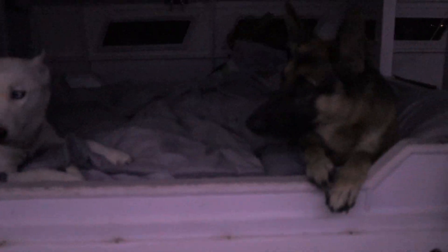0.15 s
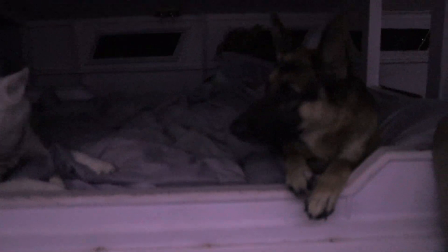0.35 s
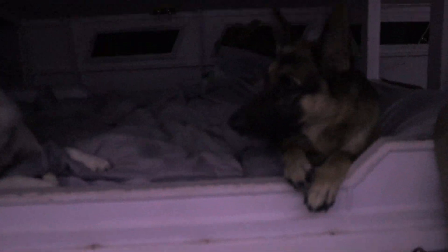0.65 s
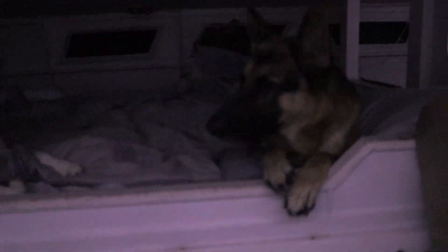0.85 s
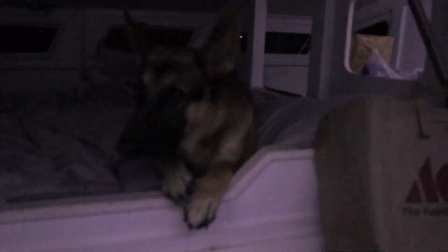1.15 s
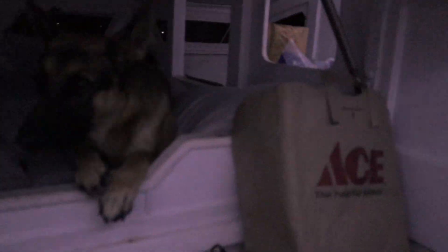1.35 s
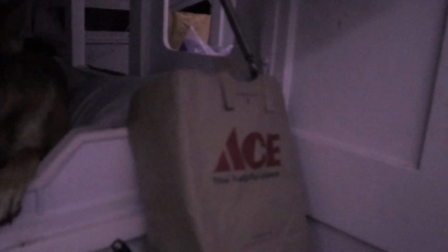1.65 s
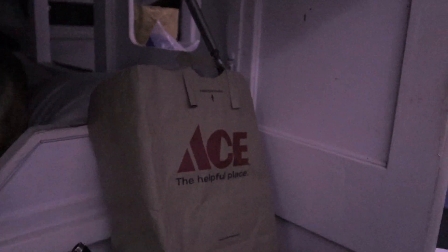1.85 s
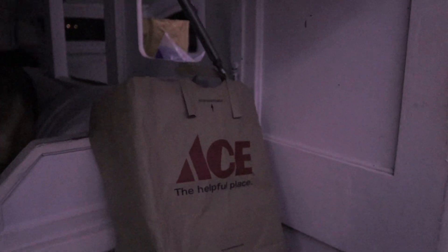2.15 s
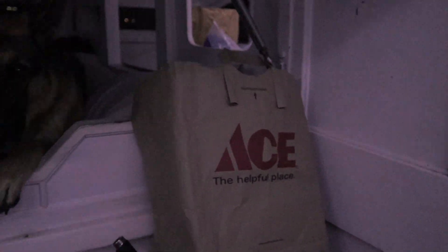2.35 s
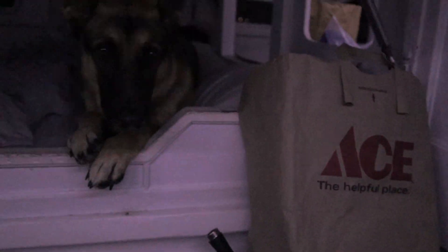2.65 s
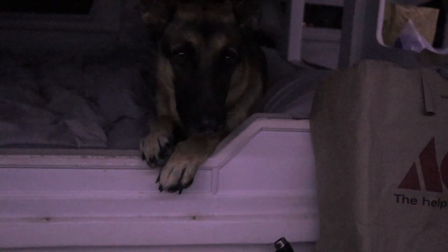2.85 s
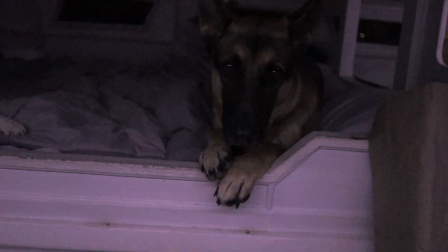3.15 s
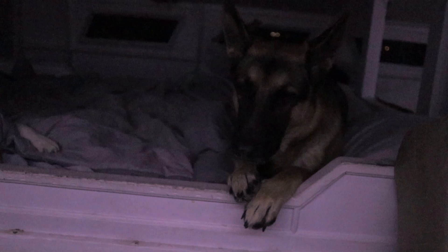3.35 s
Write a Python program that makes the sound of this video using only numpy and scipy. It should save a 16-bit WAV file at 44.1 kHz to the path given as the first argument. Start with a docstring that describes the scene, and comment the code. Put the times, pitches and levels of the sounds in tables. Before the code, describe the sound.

Strong storm wind rushes and howls in gusts around a boat cabin, with slaps and clacks

```python
"""Three gusts of storm wind rush past a moored boat, heard in the cabin: octave bands of noise. They buffet the
hull (low noise) and waves thump its panels (decaying sines); a hollow howl wavers in the rigging (tones in
narrow noise). Something loose, probably canvas, slaps on the cabin (noise bursts with panel resonances);
fittings clack and woodwork knocks (struck modes with noise). Light ticks sound in the boat and fine spray
hisses outside (filtered noise with grains)."""
import sys
import numpy as np
from scipy import signal
from scipy.fft import rfft, irfft
from scipy.io import wavfile
from scipy.ndimage import uniform_filter1d, minimum_filter1d

SR = 44100
rng = np.random.default_rng(int(sys.argv[2]) if len(sys.argv) > 2 else 0)


def bounce(signal):
    """Save signal as a 16-bit WAV file at the path given by the first command-line argument."""
    frames = np.transpose(np.atleast_2d(signal))
    limited = np.clip(frames, -1, 1)
    pcm = np.round(limited * 32767).astype(np.int16)
    wavfile.write(sys.argv[1], SR, pcm)


N = 154350
T = np.arange(N) / SR
FREQS = np.fft.rfftfreq(N, 1 / SR) + 1  # offset keeps the logarithms finite
CONTACT_S = 0.0014


def undb(db):
    """Decibels to gain."""
    return 10 ** (np.asarray(db) / 20)


def unit(x):
    """Scale to rms 1."""
    return x / np.sqrt(np.mean(x ** 2))


def curve(table, axis=1):
    """One column of a time table, joined by straight lines."""
    rows = np.array(table)
    return np.interp(T, rows[:, 0], rows[:, axis])


def over_hz(points):
    """A table read on a log-frequency axis."""
    rows = np.array(points)
    return np.interp(np.log(FREQS), np.log(rows[:, 0]), rows[:, 1])


def shape(x, gain):
    """Filter by a gain per frequency."""
    return irfft(rfft(x) * gain, N)


def noise():
    """Two unrelated noises: the middle and the sides of the sound field."""
    return rng.standard_normal((2, N))


def walk(rate_hz):
    """Smooth random wander, Gaussian spectrum, rms 1."""
    return unit(shape(rng.standard_normal(N), np.exp(-(FREQS / rate_hz) ** 2 / 2)))


def flutter(rate_hz):
    """Quick eddies with slow drift weakened, rms 1."""
    return unit(shape(rng.standard_normal(N), FREQS * np.exp(-(FREQS / rate_hz) ** 2 / 2)))


def grains(count):
    """Scattered clicks of unequal size, rms 1."""
    draw = rng.random((count, 4))
    size = (.02 + draw[:, 1]) ** -.4
    out = np.zeros((2, N))
    out[:, (draw[:, 0] * N).astype(int)] = size * np.sign(draw[:, 2:].T - .5)
    return unit(out)


def burst(start, rise, decay):
    """Straight rise, exponential fall (seconds)."""
    age = T - start
    return np.clip(age / rise, 0, 1) * np.exp(-np.maximum(age - rise, 0) / decay)


def struck(start, modes):
    """Modes set ringing by one soft-edged blow."""
    age = T[:SR // 4]
    ring = sum(undb(db) * np.sin(2 * np.pi * hz * age) * np.exp(-np.log(1000) * age / t60)
               for hz, db, t60 in modes)
    soft_edge = 1 - np.exp(-(age / CONTACT_S) ** 2)
    return np.pad(ring * soft_edge, (int(start * SR), N))[:N]


def cabin(x, t60, wet_db):
    """Short dense echoes of a small cabin: a decaying noise tail per channel."""
    age = T[:SR // 3]
    tail = rng.standard_normal((2, len(age))) * undb(-60 * age / t60)
    tail /= np.sqrt(np.sum(tail ** 2, axis=1, keepdims=True))
    echoes = signal.fftconvolve(x, tail, axes=1)[:, :N]
    return (x + undb(wet_db) * echoes) / np.hypot(1, undb(wet_db))


# Wind strength. Each row: time in seconds, relative level in dB (stretched in the treble).
GUST_STRENGTH = [(0, -1), (.2, 4), (.36, 5.5), (.52, 4), (.78, -2.5), (.9, 0.5), (1.02, -2.5), (1.15, 1.5),
                 (1.3, 4), (1.5, 2.5), (1.66, 0.5), (2.0, 0.5), (2.2, 4.5), (2.45, 5), (2.65, 1),
                 (2.86, 0.5), (3.1, 0), (3.36, -1), (3.5, 1)]
# Spectrum of the rushing air. Each row: frequency in Hz, relative density in dB per Hz.
RUSH_SPECTRUM = [(120, -13), (220, 0.5), (320, -0.5), (480, -4.5), (750, -8), (1050, -12.5), (1650, -14.5),
                 (2200, -19), (3200, -23.5), (4300, -30), (6300, -37), (8500, -48), (11300, -53.5),
                 (14500, -75.5)]
RUSH_DB, FLUTTER_DB, FLICKER_DB = -25.5, 1.1, 1.25


def rush(treble_push=1.53):
    """Turbulent air: octave bands follow the gusts, flutter together and flicker alone."""
    air = rfft(noise()) * undb(over_hz(RUSH_SPECTRUM))
    air /= np.std(irfft(air, N))
    gust_db = curve(GUST_STRENGTH)
    shared_db = FLUTTER_DB * flutter(7.3)
    octave = np.clip(np.log2(FREQS / 125), 0, 7)
    out = 0
    for k in range(8):
        band = np.maximum(1 - abs(octave - k), 0)
        push = np.interp(k, [2, 5], [1, treble_push])  # gusts swing the treble more
        level_db = push * gust_db + shared_db + FLICKER_DB * flutter(24.5)
        out = out + irfft(air * band, N) * undb(level_db)
    return out * undb(RUSH_DB)


# Boom of the buffeted hull. Each row: time in seconds, level in dB.
BOOM_LEVEL = [(0, -40), (.09, -27), (.15, -28), (.24, -30), (.32, -21.5), (.46, -26), (.75, -32),
              (1.05, -36), (1.25, -23), (1.56, -26.5), (1.68, -32), (2.05, -25.5), (2.31, -26), (2.38, -21),
              (2.48, -21), (2.54, -28), (2.9, -28), (3.5, -31)]
# Boom spectrum. Each row: frequency in Hz, relative density in dB per Hz.
BOOM_SPECTRUM = [(50, -27), (75, -4), (102, 2.5), (121, -7.5), (140, -1), (170, -3), (205, -5), (260, -9.5),
                 (500, -37), (1200, -77)]
# Deep pressure swell in the cabin. Each row: time in seconds, level in dB.
SWELL_LEVEL = [(0, -41), (.25, -31), (.37, -27), (.5, -35), (.95, -41), (1.25, -30.5), (1.4, -26),
               (1.65, -30), (2.0, -31.5), (2.37, -29.5), (2.6, -39), (2.9, -34), (3.5, -30.5)]
# Swell spectrum. Each row: frequency in Hz, relative density in dB per Hz.
SWELL_SPECTRUM = [(12, -20), (25, -5), (38, -15), (54, -2.5), (70, -8.5), (100, -13), (200, -23),
                  (600, -68)]


def buffet():
    """Gusts make the hull boom and pump the air in the cabin: two bands of low noise."""
    boom = unit(shape(noise(), undb(over_hz(BOOM_SPECTRUM)))) * undb(curve(BOOM_LEVEL))
    swell = unit(shape(noise(), undb(over_hz(SWELL_SPECTRUM)))) * undb(curve(SWELL_LEVEL))
    return boom + swell


# Waves slap the hull panels. Each row: start in seconds, base pitch in Hz, relative level in dB, # rise in
# seconds, decay in seconds.
PANEL_THUMPS = [(0.113, 99.3, -20.5, 0.032, .05), (.285, 109.5, -10.5, 0.0083, 0.037),
                (0.329, 136, -10.5, 0.013, 0.02), (.34, 55, -16, 0.027, 0.032),
                (0.394, 267, -16.5, 0.0065, 0.035), (1.29, 200, -16, 0.021, 0.035),
                (1.345, 59.4, -24, 0.017, 0.06), (1.35, 130.4, -17, 0.018, 0.14),
                (1.49, 137.7, -18.5, 0.017, 0.047), (1.584, 208, -15, 0.011, .03),
                (2.216, 119, -13.5, 0.01, 0.03), (2.34, 94.7, -10, .01, 0.034),
                (2.395, 142.2, -10, 0.024, 0.051), (2.445, 102.3, -12.5, 0.023, 0.018)]
# Modes of a hull panel. Each row: multiple of the base pitch, relative level in dB.
HULL_MODES = [(1, -1.5), (1.579, -16), (2.3, -26)]


def thumps():
    """Hull panels swell into a boom as waves slap them, each at its own pitch."""
    out = 0
    for start, hz, db, rise, decay in PANEL_THUMPS:
        envelope = burst(start, rise, decay)
        for ratio, mode_db in HULL_MODES:
            out = out + undb(db + mode_db) * envelope * np.sin(2 * np.pi * hz * ratio * (T - start))
    return np.array([out, out])


# Main howl. Each row: time in seconds, centre pitch in Hz, level in dB.
MAIN_HOWL = [(0, 345, -49), (.55, 338, -32), (.72, 325, -28), (.82, 322, -26.5), (.9, 330, -27),
             (.99, 345, -25), (1.09, 340, -23.5), (1.2, 325, -27.5), (1.65, 338, -29.5), (1.85, 330, -27.5),
             (2.03, 320, -21), (2.2, 325, -29.5), (2.33, 330, -24.5), (2.65, 330, -26), (2.95, 335, -25.5),
             (3.09, 335, -22), (3.33, 335, -27.5), (3.5, 330, -25)]
# Higher howl. Each row: time in seconds, centre pitch in Hz, level in dB.
HIGHER_HOWL = [(0, 450, -24.5), (.05, 472, -27.5), (.12, 440, -62), (.8, 390, -40), (.97, 413, -28),
               (1.08, 423.6, -31.5), (1.16, 440, -29.5), (1.3, 415, -35), (1.9, 405, -49), (2.5, 415, -41),
               (2.66, 415, -27), (2.78, 414, -28), (2.9, 416, -23.5), (3.05, 420, -25), (3.19, 424, -23.5),
               (3.29, 410, -30.5), (3.5, 405, -33)]
# Fainter howl that comes and goes. Each row: time in seconds, centre pitch in Hz, level in dB.
FAINTER_HOWL = [(.15, 360, -42), (.21, 365, -24), (.28, 385, -44), (1.0, 450, -56), (1.1, 500, -30),
                (1.2, 540, -46), (1.3, 540, -55), (2.12, 510, -45), (2.23, 495, -32), (2.38, 475, -33),
                (2.48, 400, -58), (2.6, 385, -33), (2.9, 384, -28.5), (3.15, 387, -29), (3.3, 365, -26),
                (3.5, 360, -45)]


def howl(table, width_hz, waver, tone):
    """Vortices shed by the rigging: a wavering tone inside a narrow band of noise."""
    pitch_hz = curve(table) * (1 + waver * walk(13.0))
    phase = 2 * np.pi * np.cumsum(pitch_hz) / SR
    pair = []
    for steady in (2 * tone, 0):  # the sides get noise only
        in_phase = (steady + walk(width_hz)) * np.sin(phase)
        quadrature = walk(width_hz) * np.cos(phase)
        pair.append(unit(in_phase + quadrature))
    return np.array(pair) * undb(curve(table, axis=2))


# Slaps on the cabin. Each row: start in seconds, relative level in dB, rise in seconds,
# decay in seconds, brightness in dB per octave.
SLAP_EVENTS = [(.225, -25.5, 0.0059, .0081, -2), (.308, -24, 0.0056, 0.055, -1),
               (0.34, -16.5, 0.011, .026, -2.5), (0.407, -30, 0.0043, 0.093, -4),
               (.463, -12.5, 0.0034, 0.018, 4.5), (0.605, -23, .0066, 0.043, -1.5),
               (1.412, -14.5, 0.017, 0.028, 0), (1.475, -25.5, 0.0051, 0.026, -3),
               (1.554, -19.5, 0.0067, 0.02, -7), (1.683, -34, 0.0088, 0.1, 5.5),
               (1.873, -24.5, 0.0038, 0.027, -0.5), (2.165, -20, 0.0046, 0.081, -8),
               (2.368, -21, 0.0034, 0.019, 1.5), (2.402, -13, .002, 0.013, -1),
               (2.447, -20.5, .0029, 0.012, -5), (2.484, -23.5, 0.0026, 0.02, 4),
               (2.512, -21.5, .004, 0.012, 5), (2.519, -18, 0.0027, 0.022, 0.5)]
# Slap spectrum, also colours clack contacts. Each row: frequency in Hz, relative density in dB per Hz.
SLAP_SPECTRUM = [(150, -9), (400, -7), (700, 3.5), (1100, -2), (1700, -2), (2300, -2.5), (3300, -3),
                 (4300, -14), (5800, -18), (8000, -31.5), (11000, -92), (15000, -66)]
# Cabin panels that ring. Each row: frequency in Hz, width in Hz, relative level in dB.
CABIN_PANELS = [(1552, 50, -4), (1745, 42, -2), (1922, 42, -6), (2308, 60, -5), (2617, 42, -5),
                (2848, 45, -5), (3200, 35, -6), (3423, 30, -6)]
SLAP_DB, SLAP_ECHO_DB = 2, -5


def slaps(crackle=0.7):
    """Each slap is a dense crumple of small impacts that rings the cabin panels."""
    ring = 1 + sum(undb(db) / (1 + 2j * (FREQS - hz) / width) for hz, width, db in CABIN_PANELS)
    crumple = rfft(noise() + crackle * grains(count=2500)) * undb(over_hz(SLAP_SPECTRUM)) * ring
    octaves = np.log2(np.maximum(FREQS, 400) / 2000)
    out = 0
    for start, db, rise, decay, tilt in SLAP_EVENTS:
        tilted = unit(irfft(crumple * undb(tilt * octaves), N))
        out = out + tilted * undb(db) * burst(start, rise, decay)
    return cabin(out, t60=0.16, wet_db=SLAP_ECHO_DB) * undb(SLAP_DB)


CRACK_DB, CRACK_DECAY_S = -13, 0.0022


def crack(start):
    """The brief noise of a hard contact."""
    return rng.standard_normal((2, N)) * burst(start, CONTACT_S, CRACK_DECAY_S)


# Hard fittings that clack. Each row: start in seconds, base pitch in Hz, relative level in dB,
# base ring t60 in seconds.
CLACK_EVENTS = [(.347, 2950, -20, .09), (.358, 2200, -16, 0.068), (.465, 3020, -22, 0.061),
                (0.473, 1540, -19, 0.15), (.480, 4950, -29, 0.047), (0.61, 2880, -20, 0.069),
                (.621, 2160, -18, 0.05), (.728, 3750, -30, .09), (1.477, 2880, -18.5, 0.027),
                (1.562, 3440, -29, .03), (1.681, 3080, -23, 0.02), (1.740, 2620, -28, .03),
                (1.875, 2865, -21, .05), (2.368, 2330, -27, 0.054), (2.403, 2690, -16, 0.098),
                (2.404, 1726, -14, .14), (2.448, 3050, -25, .09), (2.486, 2790, -12, 0.064),
                (2.521, 3410, -23, 0.05), (2.537, 1378, -20.5, 0.18)]
# Modes of a fitting. Each row: multiple of the base pitch, relative level in dB, share of the base t60.
FITTING_MODES = [(1.002, 0, 1), (1.025, -13, 0.77), (1.118, -5.5, 0.76), (1.31, -15.5, .7)]


def clacks():
    """Small hard fittings hit the cabin with a crack and ring briefly, each at its own pitch."""
    ring, contact = 0, 0
    for start, hz, db, t60 in CLACK_EVENTS:
        modes = [(hz * ratio, mode_db, t60 * share) for ratio, mode_db, share in FITTING_MODES]
        ring = ring + undb(db) * struck(start, modes)
        contact = contact + undb(db) * crack(start)
    colour = unit(undb(over_hz(SLAP_SPECTRUM)))
    contact = shape(contact, colour) * undb(CRACK_DB)
    return cabin(np.array([ring, -ring]) + contact, t60=0.087, wet_db=-2.5)


# Blows on woodwork. Each row: start in seconds, relative level in dB.
KNOCK_EVENTS = [(.128, -24.5), (1.740, -25.5), (2.085, -22)]
# Modes of the wood. Each row: frequency in Hz, relative level in dB, t60 in seconds.
WOOD_MODES = [(236, -7, 0.049), (479, -15, 0.041), (632, 2, 0.092), (764, 0, 0.058), (1130, -14, 0.024)]
KNOCK_DB, THUD_DB, THUD_HZ, THUD_DECAY_S = 6, 10, 1200, .008


def knocks():
    """Dull blows on woodwork: a muffled thud and a short ring."""
    ring = sum(undb(db) * struck(start, WOOD_MODES) for start, db in KNOCK_EVENTS)
    blows = sum(undb(db) * burst(start, CONTACT_S, THUD_DECAY_S) for start, db in KNOCK_EVENTS)
    muffle = undb(THUD_DB) / np.sqrt(1 + (FREQS / THUD_HZ) ** 6)
    thud = shape(noise() * blows, muffle)
    return cabin(np.array([ring, ring / 2]) + thud, t60=0.092, wet_db=-2) * undb(KNOCK_DB)


# Light ticks. Each row: start in seconds, relative level in dB, decay in seconds,
# brightness in dB per octave.
TICK_EVENTS = [(0.174, -36.5, 0.014, -6), (0.307, -32, 0.022, 3), (.583, -50, 0.01, 15),
               (.724, -40.5, 0.015, -17), (0.918, -41.5, 0.016, -3), (1.248, -38, 0.018, -1),
               (1.556, -34.5, 0.026, -6.5), (1.735, -35, 0.013, -5), (2.111, -44, 0.015, -4),
               (2.517, -26.5, 0.0055, -13), (2.752, -44, 0.022, 0), (2.864, -41.5, .014, -6),
               (3.124, -40.5, 0.033, -4.5)]
# Tick spectrum. Each row: frequency in Hz, relative density in dB per Hz.
TICK_SPECTRUM = [(500, -23), (1500, -10), (3500, 4.5), (6000, -0.5), (8500, 0.5), (11500, -3.5),
                 (14500, -35)]
TICK_DB = 4.5


def ticks(rise_s=0.009):
    """Small scuffs: bursts of grainy noise, each tilted above 3.5 kHz."""
    scuff = rfft(noise() + 0.16 * grains(count=3000)) * undb(over_hz(TICK_SPECTRUM))
    octaves = np.log2(np.maximum(FREQS, 3500) / 3500)
    out = 0
    for start, db, decay, tilt in TICK_EVENTS:
        tilted = unit(irfft(scuff * undb(tilt * octaves), N))
        out = out + tilted * undb(db + TICK_DB) * burst(start, rise_s, decay)
    return out


# Hiss of spray. Each row: time in seconds, mean level in dB.
SPRAY_LEVEL = [(0, -51), (.2, -41.5), (.5, -49), (.7, -58), (.88, -54), (.97, -47), (1.15, -44.5),
               (1.6, -51.5), (1.85, -46.5), (2.02, -56), (2.13, -40.5), (2.33, -44), (2.65, -49.5),
               (3.05, -48.5), (3.5, -47)]
# Spray spectrum. Each row: frequency in Hz, relative density in dB per Hz.
SPRAY_SPECTRUM = [(1000, -9), (3000, 1), (6000, 1.5), (8500, -3.5), (11300, -1), (12800, -19), (14500, -36)]


def spray(drops=0.44, flicker_db=1):
    """Fine spray hisses on the cabin, with single drops in it."""
    hiss = shape(noise() + drops * grains(count=1500), undb(over_hz(SPRAY_SPECTRUM)))
    return unit(hiss) * undb(curve(SPRAY_LEVEL) + flicker_db * walk(12))


# Likeness of left and right. Each row: frequency in Hz, likeness (clipped to -0.98..0.9995 in use).
STEREO_LIKENESS = [(60, 3.5), (300, 1), (620, 0.7), (1360, 0.06), (2980, -0.51), (6500, -0.66),
                   (9000, -0.92), (14000, -0.6)]
# Stereo balance. Each row: frequency in Hz, left minus right in dB (faded out in the bass).
STEREO_BALANCE = [(200, -1.9), (370, -1.5), (680, -2.5), (1250, -2.5), (2290, -3), (4210, -1.3),
                  (7730, -0.2), (14200, -2)]
CENTRED_HZ, SLAP_PAN_DB = 170, -1


def spread(x, pan_db):
    """Middle and sides to left and right: centred bass, very wide treble."""
    alike = np.clip(over_hz(STEREO_LIKENESS), -.98, .9995)
    mid, side = shape(x, np.sqrt(np.array([1 + alike, 1 - alike]) / 2))
    lean_db = (over_hz(STEREO_BALANCE) + pan_db) / (1 + (CENTRED_HZ / FREQS) ** 4)
    return shape(np.array([mid + side, mid - side]), undb(np.array([lean_db, -lean_db]) / 2))


def scene():
    """Wind, howl and the noises of the boat."""
    howls = howl(MAIN_HOWL, width_hz=26, waver=0.00895, tone=0.43)
    howls = howls + howl(HIGHER_HOWL, width_hz=13, waver=0.0072, tone=0.97)
    howls = howls + howl(FAINTER_HOWL, width_hz=12, waver=0.0111, tone=0.81)
    around = spread(rush() + buffet() + howls + spray() + ticks() + knocks(), 0)
    hits = spread(slaps() + clacks(), SLAP_PAN_DB)
    return around + hits + thumps()


CEILING, TOP_HZ = .85, 14800


def record(dry):
    """A limiter eases the highest peaks; the top is cut."""
    allowed = np.minimum(1, CEILING / (np.abs(dry).max(axis=0) + 1e-9))
    gain = uniform_filter1d(minimum_filter1d(allowed, size=201), size=201)
    low_pass = signal.ellip(8, .2, 70, TOP_HZ, fs=SR, output="sos")
    return signal.sosfilt(low_pass, dry * gain)


dry = scene()
out = record(dry)
bounce(out)
```